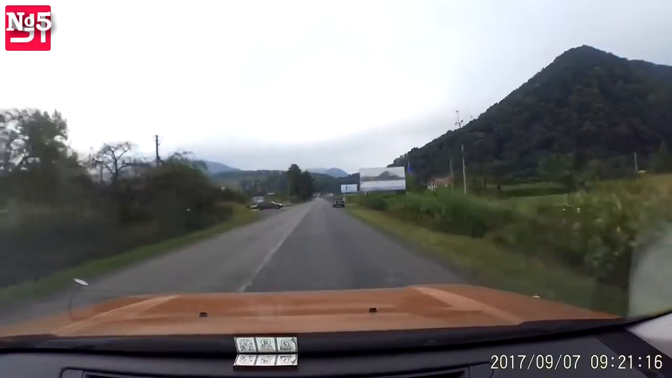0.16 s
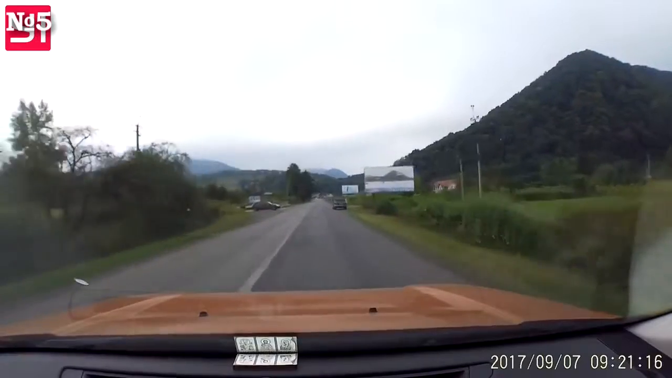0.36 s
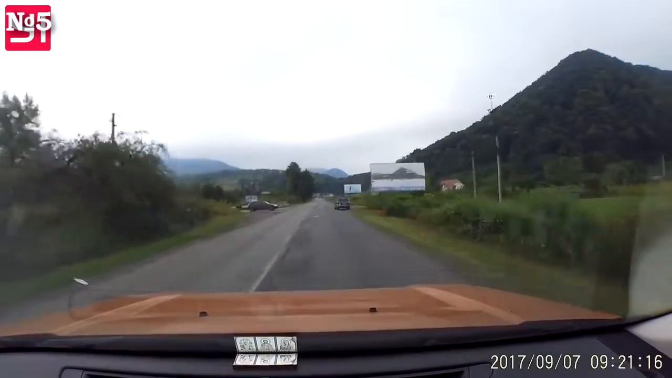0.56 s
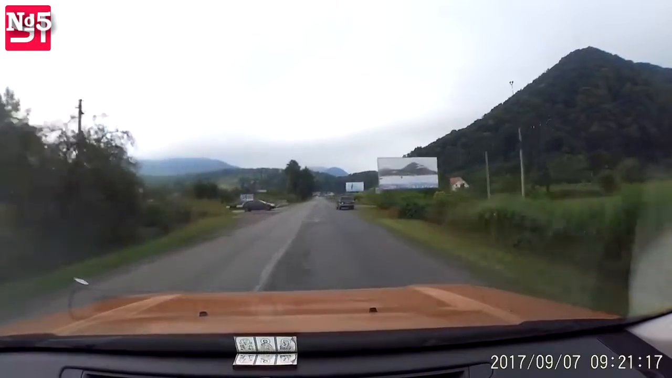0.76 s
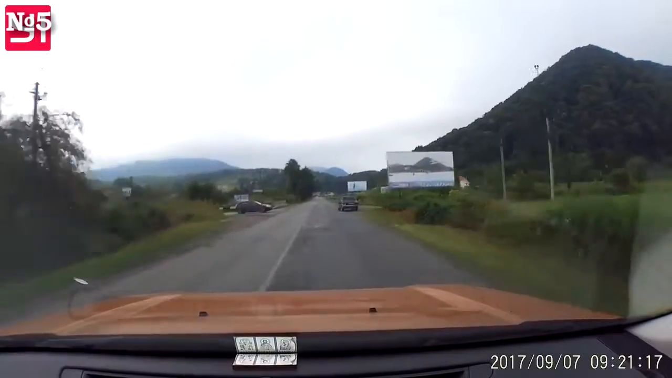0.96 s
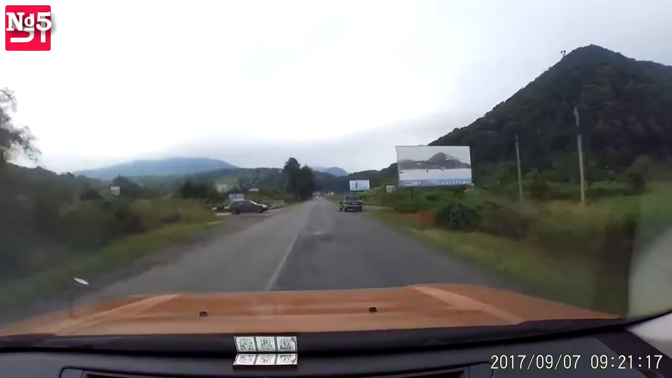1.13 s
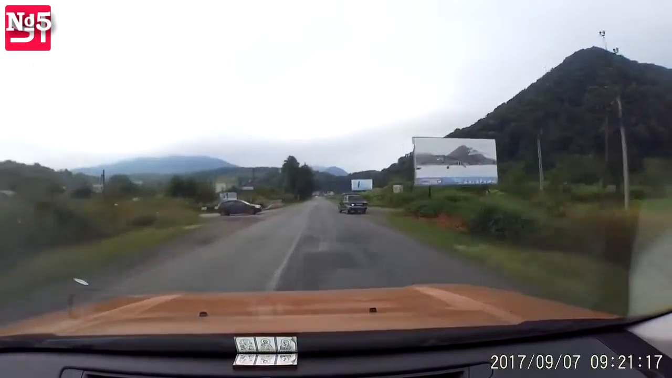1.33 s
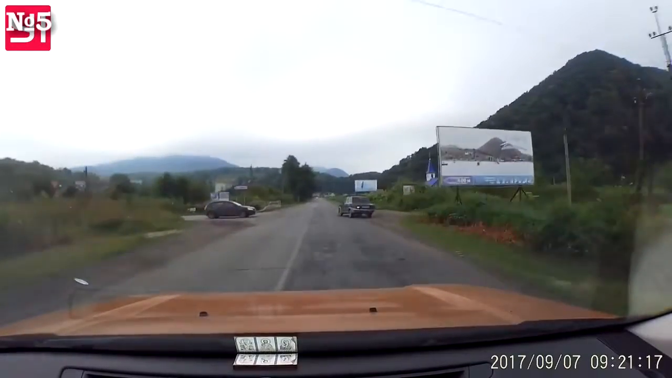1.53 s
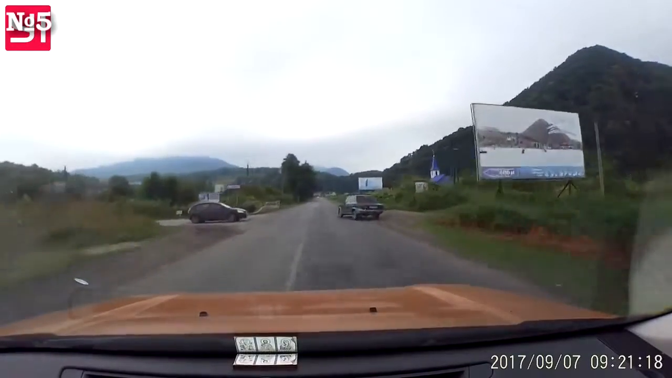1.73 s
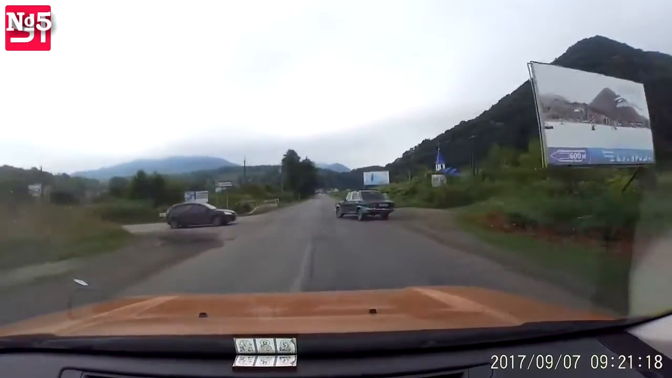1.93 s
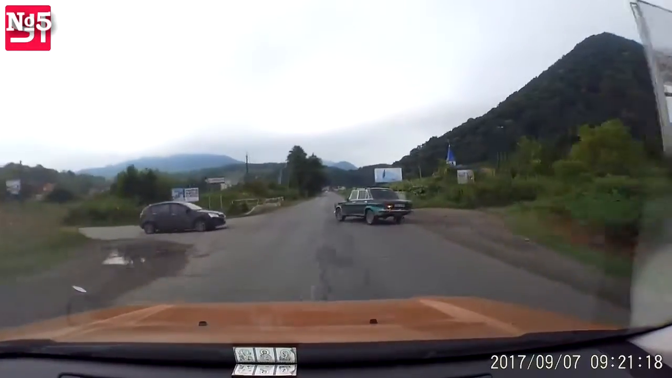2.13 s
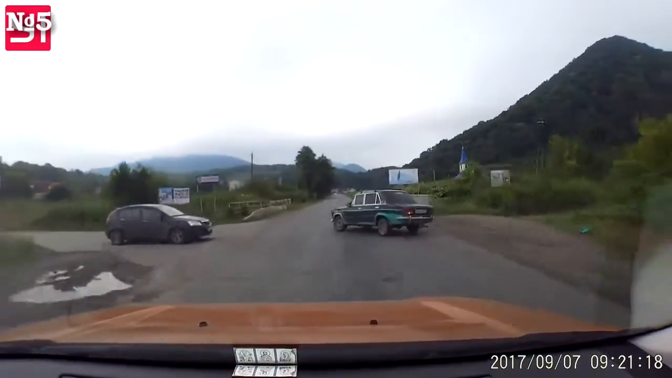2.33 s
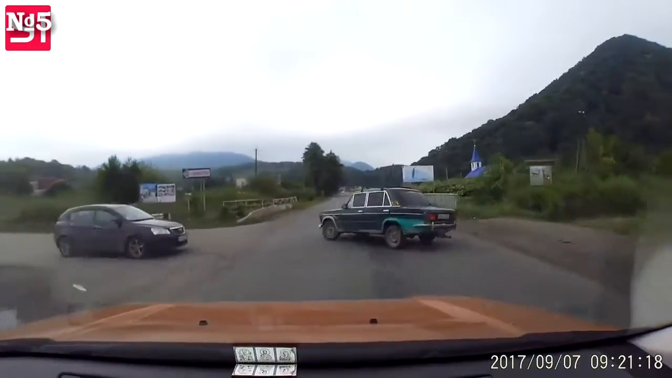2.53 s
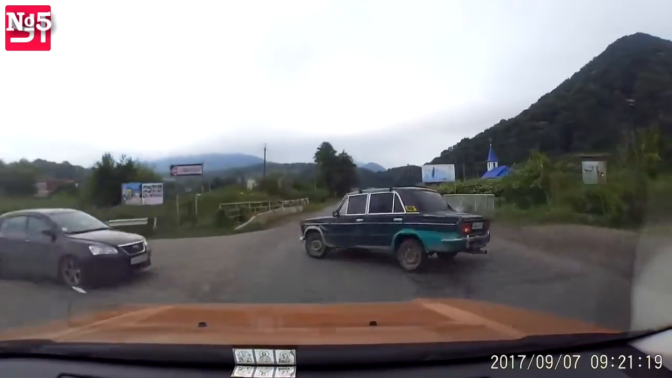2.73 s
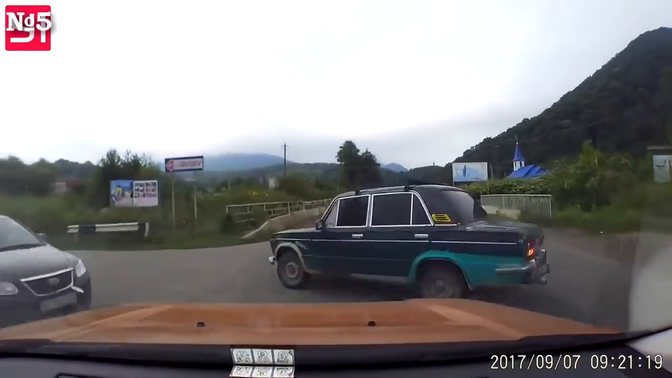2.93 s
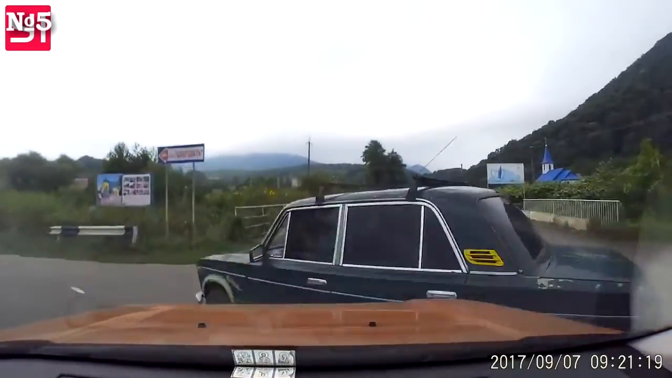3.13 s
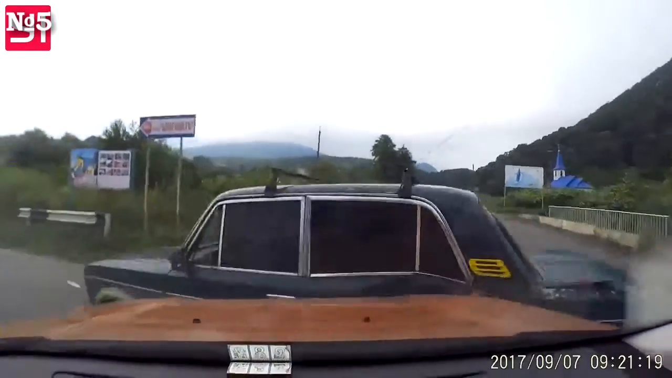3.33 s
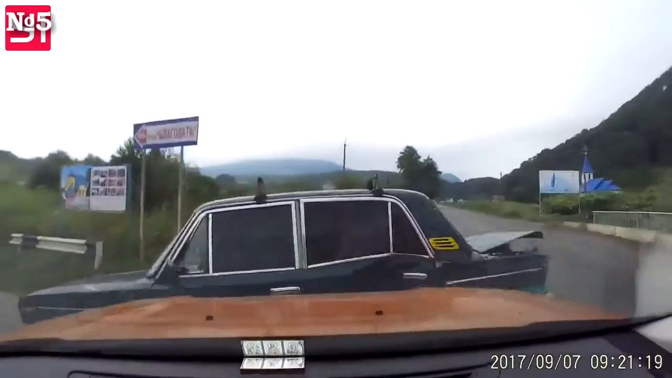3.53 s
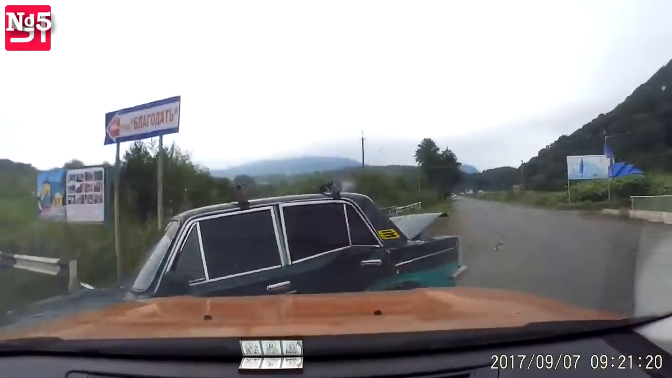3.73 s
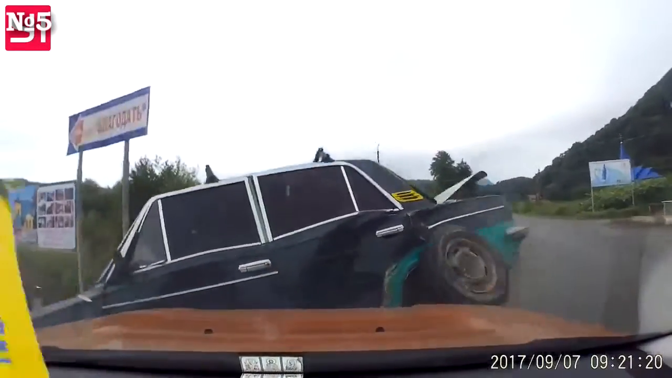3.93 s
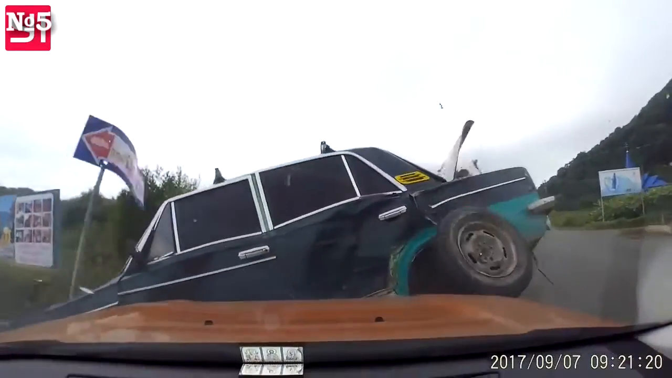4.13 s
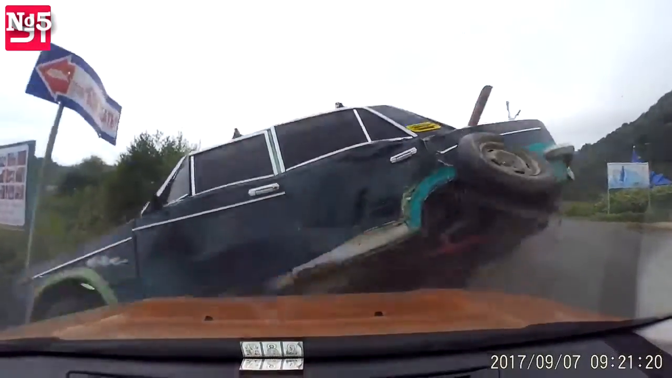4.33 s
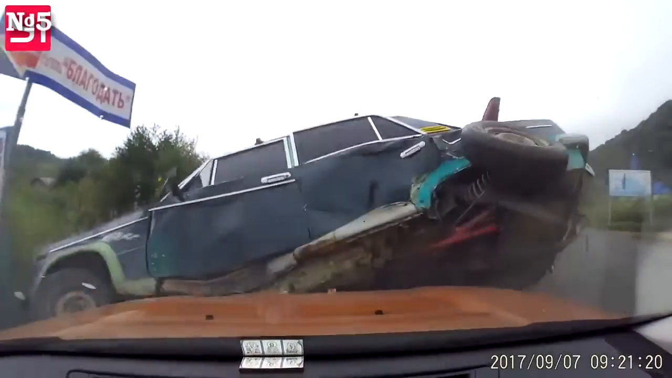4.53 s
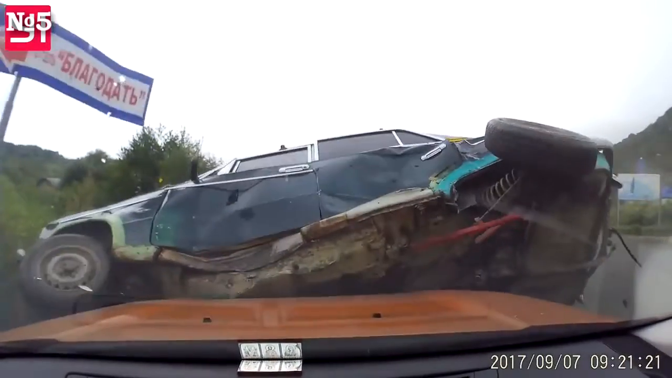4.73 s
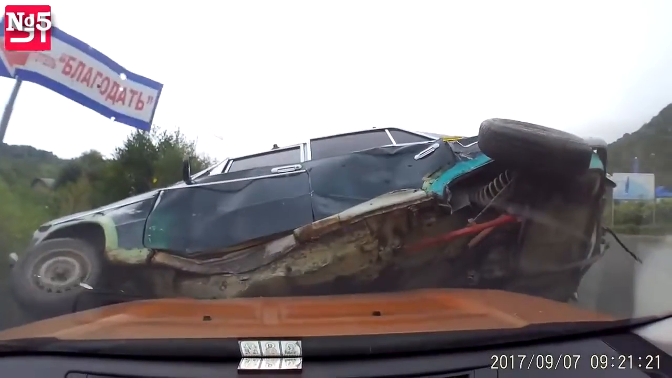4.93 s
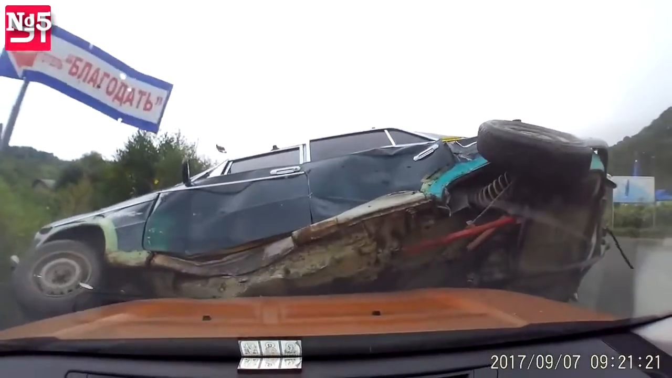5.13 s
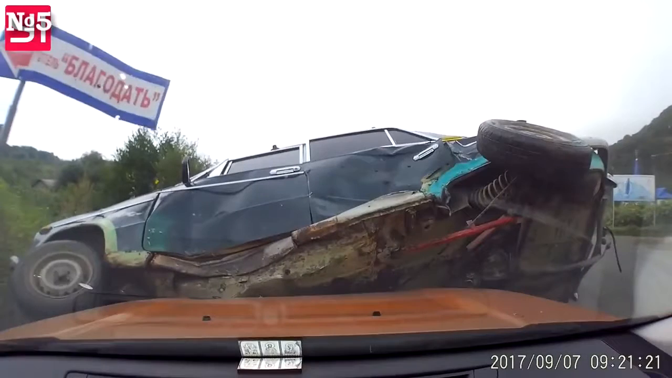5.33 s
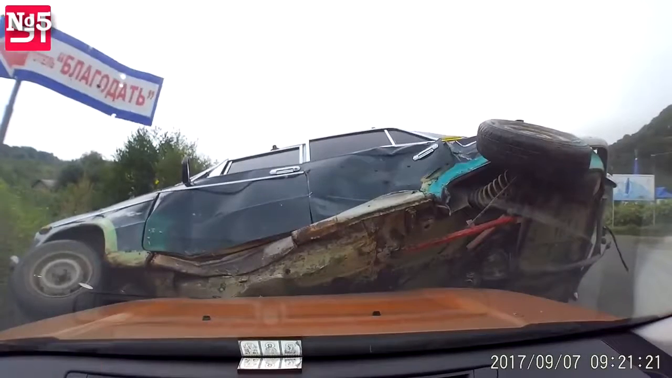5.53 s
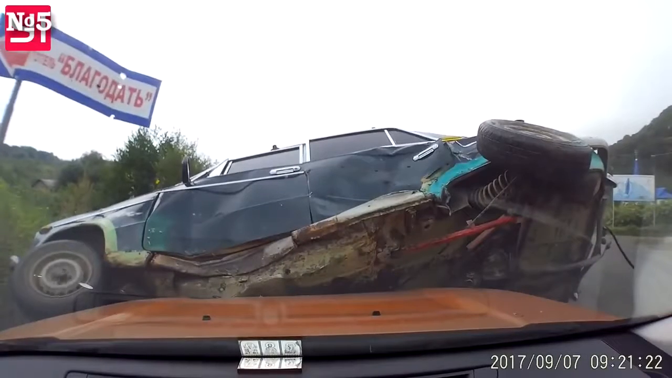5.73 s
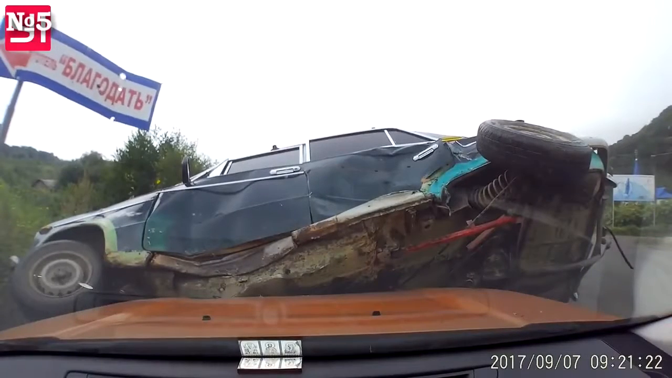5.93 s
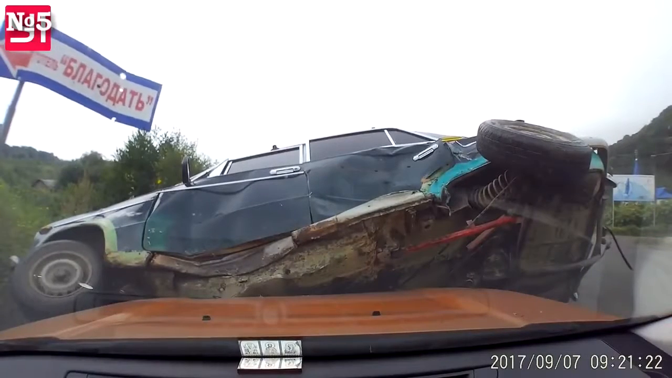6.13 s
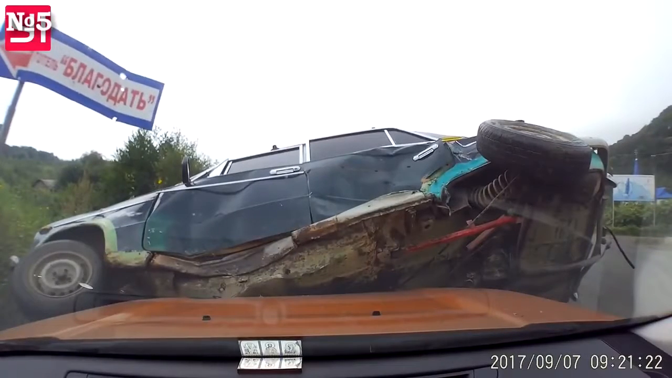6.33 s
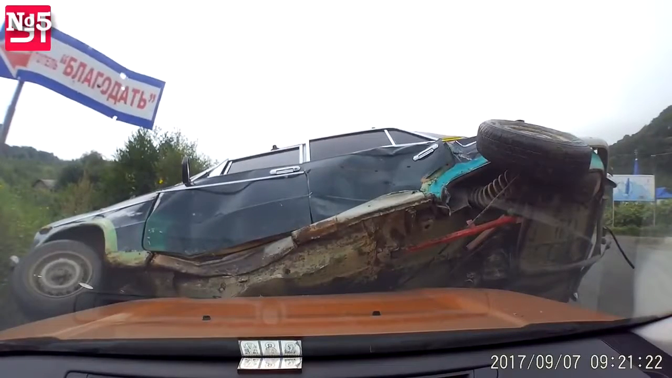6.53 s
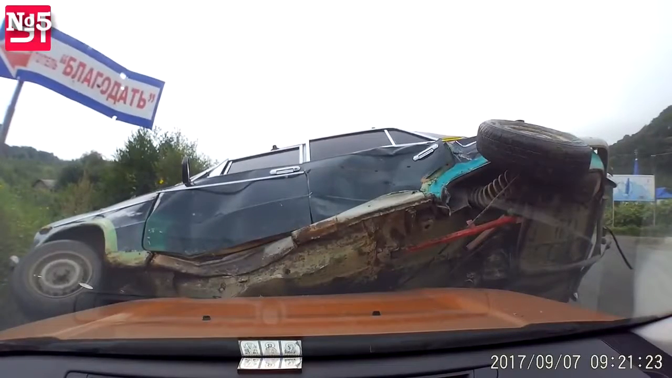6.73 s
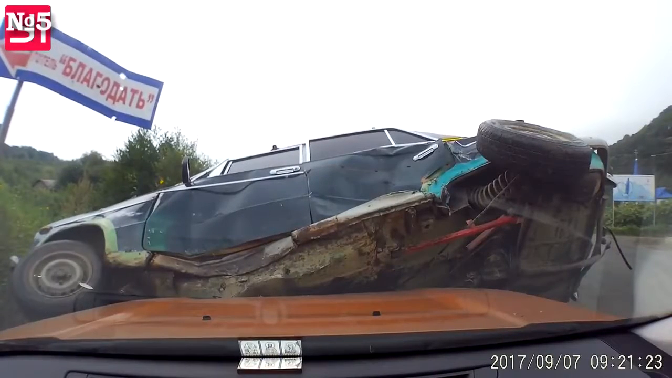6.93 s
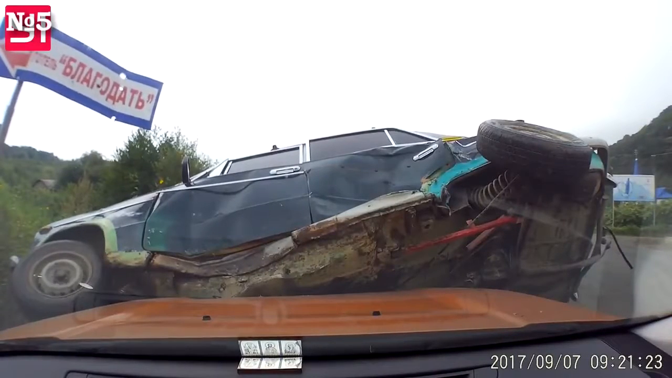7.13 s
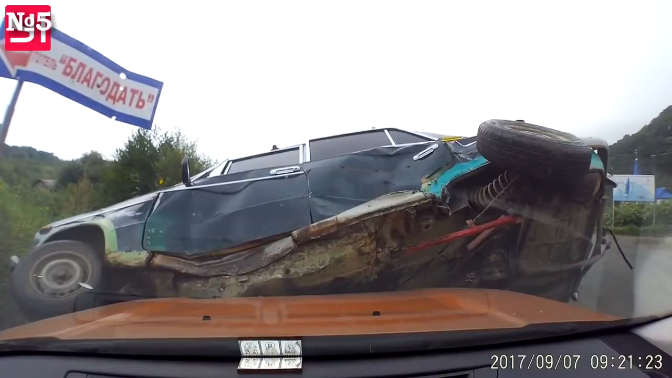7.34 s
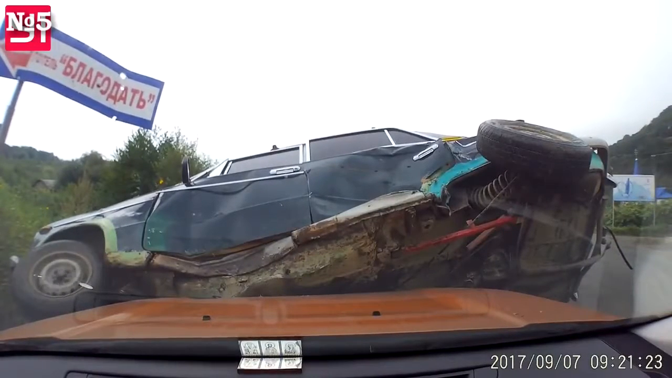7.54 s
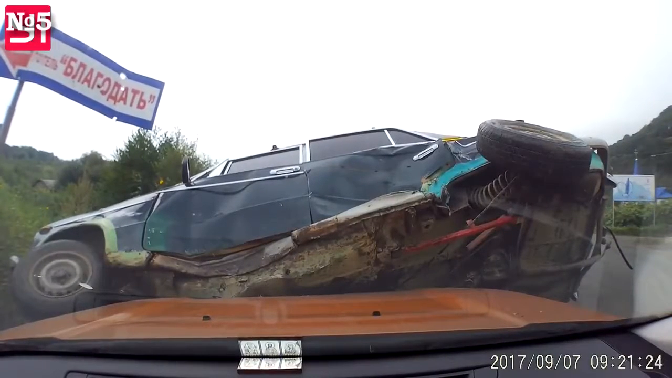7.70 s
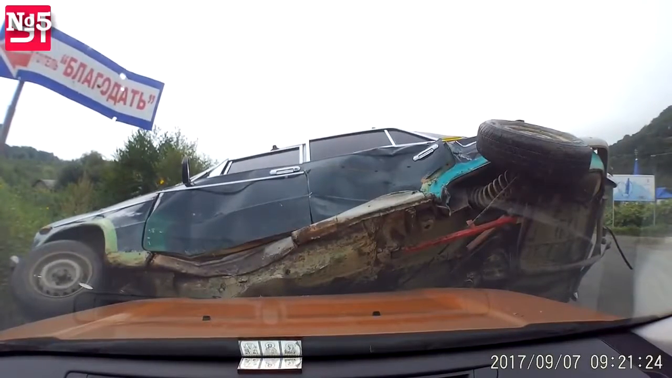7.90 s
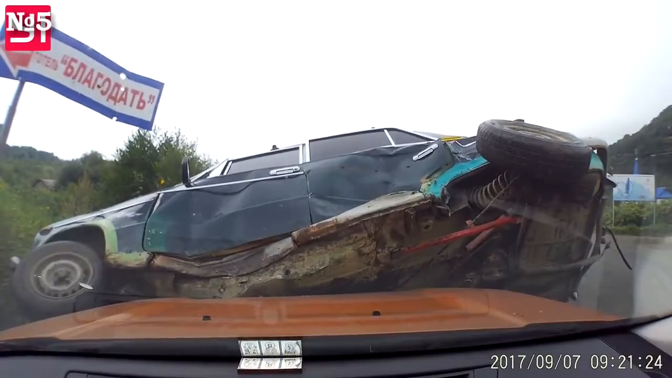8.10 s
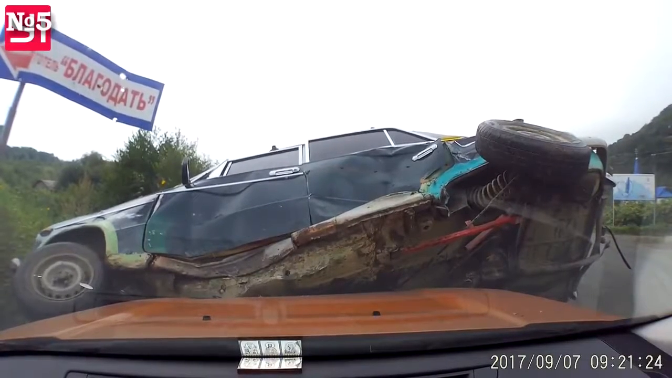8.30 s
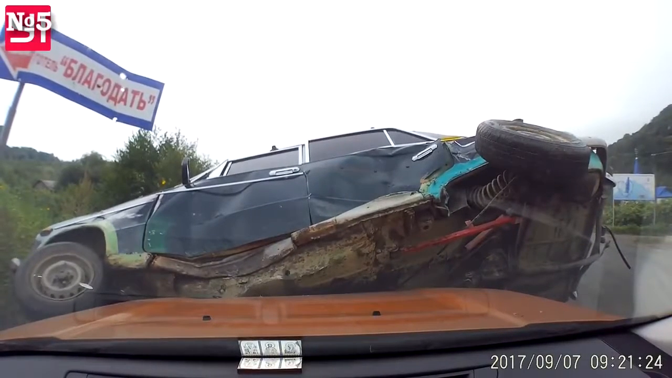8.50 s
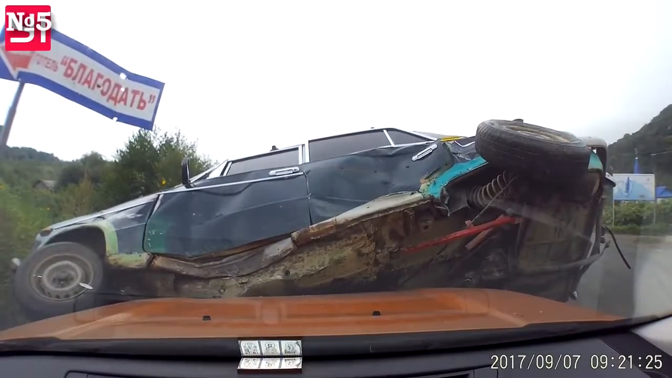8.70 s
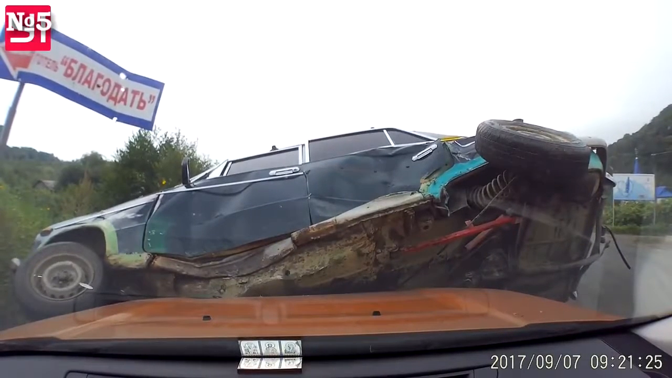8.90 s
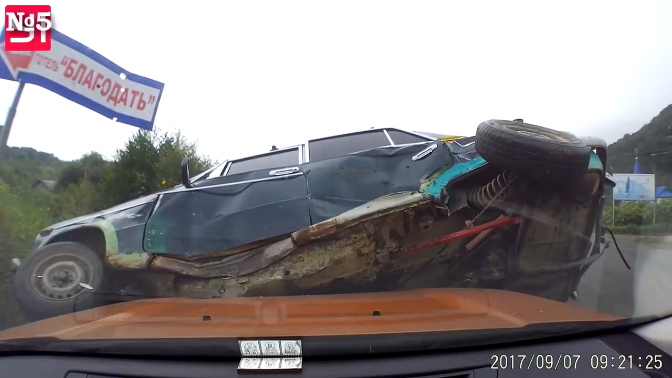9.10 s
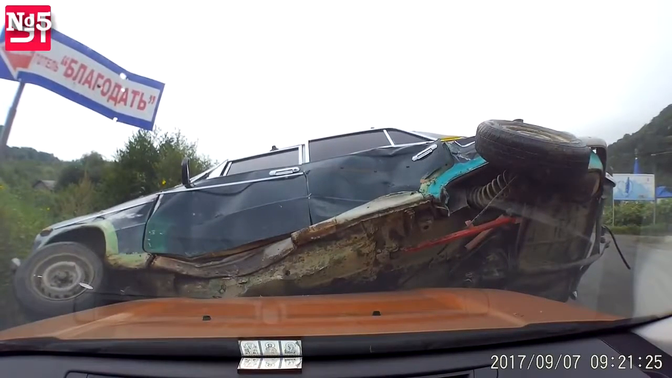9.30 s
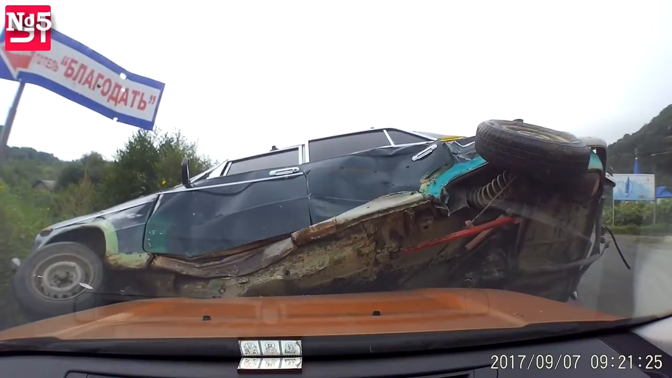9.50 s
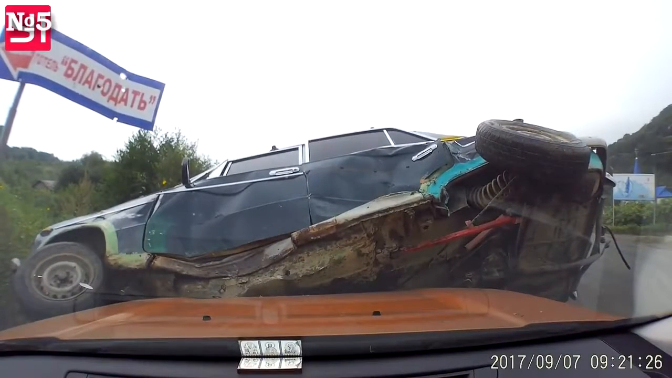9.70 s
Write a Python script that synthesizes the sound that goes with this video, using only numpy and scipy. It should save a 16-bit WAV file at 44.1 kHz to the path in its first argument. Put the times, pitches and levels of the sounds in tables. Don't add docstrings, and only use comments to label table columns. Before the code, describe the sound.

Close, boxy in-car sound through a cheap clipping microphone. Low road boom and roar swell as locked tyres scrape over grit. Several blows ring panels and boom the cabin air, the loudest distorting with metal crunch and glass shatter. A second heavy slam tips the other car, debris clatters, and quiet idling with faint creaky knocks remains until the engine revs to a high, hard whine.

```python
import sys
import numpy as np
from scipy import signal
from scipy.fft import rfft, irfft
from scipy.io import wavfile
from scipy.ndimage import uniform_filter1d

SR = 44100
rng = np.random.default_rng(int(sys.argv[2]) if len(sys.argv) > 2 else 0)


def store_pcm(level_fs):
    pcm = np.round(np.clip(level_fs, -1, 1) * 32767).astype(np.int16)
    wavfile.write(sys.argv[1], SR, np.atleast_2d(pcm).T)


def attenuation_scalar(level_db):
    decades = np.asarray(level_db, float) / 20
    return 10 ** decades


N = 430416

# start in seconds, peak in dB, panel in Hz, cabin boom in dB.
THUDS = [(1.099, -39.5, 95.6, -7.5), (1.943, -14, 97.6, -29), (2.263, -17.5, 83, -9),
         (2.688, -8, 112.6, -22), (3.001, -23, 108, -27.5), (2.933, -16, 115, -11.5),
         (2.975, -29.5, 103.6, -6.5), (3.164, -15, 82, -42), (3.286, -15, 108, -10.5),
         (3.328, 3.5, 109, -11.5), (3.342, -7.5, 83.3, -25), (3.366, -11.5, 92, -14.5),
         (3.385, -41, 73.3, -30), (3.518, -22, 150, -15), (3.894, -15, 132, -33), (3.957, -11.5, 70.6, -6),
         (4.01, -10.5, 66, -25), (4.082, -14, 115, -6.5), (4.196, -24, 131, -32), (4.394, -15, 121, -26.5),
         (4.423, -17.5, 73, -15), (4.689, -39, 72.7, -32.5), (2.955, -24, 140.4, -40.5),
         (4.971, -31, 96.7, -25), (5.243, -20, 106.6, -22.5)]
# start in seconds, peak in dB, panel in Hz.
SETTLING = [
    (6.115, -38.5, 215),
    (6.329, -32.5, 78),
    (6.381, -33, 147),
    (6.764, -41.5, 71.3),
    (7.042, -32, 97),
    (7.336, -40.5, 118),
    (7.93, -27, 88.4),
]
# start in seconds, peak in dB, clack relative to peak in dB, T60 in seconds.
CRUNCHES = [(1.852, -35, -11, 0.17), (2.07, -40, 12.5, .044), (2.2264, -32.5, 2, 0.21),
            (2.696, -27, -1.5, 0.084), (2.925, -28.5, -2.5, 0.086), (2.959, -25.5, -18, 0.058),
            (3.1719, -14, 5, 0.042), (3.158, -30.5, 9.5, .04), (3.3128, -5.5, 2.5, 0.034),
            (3.3283, -18.5, 7, 0.057), (3.345, -12.5, 2.5, .04), (3.3557, -18, 1, .025),
            (3.363, -20, 4, .012), (3.935, -35.5, -3, .12), (4.054, -40.5, 9, .04),
            (4.113, -39.5, 8.5, 0.066), (4.16, -39.5, -1, 0.055), (3.4673, -27, -0.5, 0.031),
            (3.9005, -24, -10, 0.084), (4.005, -30.5, 10.5, 0.043), (4.015, -32, 7, 0.031),
            (4.396, -39, 0, 0.088), (4.5002, -35.5, 10.5, 0.044), (4.5927, -42, 8, 0.06),
            (4.743, -36, 5, 0.13), (4.812, -37.5, 2, 0.14), (4.984, -35, -11, 0.041)]
# start in seconds, peak in dB, relative clack in dB, T60 in seconds.
SHATTERS = [(2.153, -28, 1.5, 0.076), (2.6724, -32.5, 2, 0.14), (2.818, -30, -13, 0.043),
            (3.0653, -27.5, -7, 0.073), (3.085, -27, 1, 0.26), (3.416, -27.5, 4, 0.072),
            (3.429, -21.5, -3, 0.081), (3.5926, -35, -9.5, 0.046), (3.81, -45.5, 4.5, 0.11),
            (4.189, -40, -11, 0.057), (4.516, -29, 8.5, 0.007), (4.518, -23, 11, .04),
            (4.539, -27, 2.5, .058), (5.323, -35.5, 2, 0.15), (5.36, -34.5, -14, 0.071),
            (6.0954, -40.5, 1, 0.091), (6.135, -35.5, -5.5, 0.13), (6.239, -45.5, 3, 0.24),
            (6.326, -41.5, -4, 0.082)]
# start in seconds, peak in dB, clack relative to peak in dB.
DEBRIS = [(5.1484, -38, 1.5), (5.2554, -24.5, 2.5), (5.2652, -25.5, 12.5), (5.2894, -38, -3),
          (5.482, -35.5, -0.5), (5.537, -43.5, 5), (5.7238, -33, 6.5), (5.783, -36, 4.5),
          (5.8107, -31.5, 0.5), (5.8627, -44, 9), (6.123, -28.5, -2.5), (6.3763, -48, 13.5),
          (7.0342, -48, 11.5), (7.3442, -49, 11)]
# start in seconds, peak in dB, fizz relative to peak in dB.
GRIT_TICKS = [(0.204, -33, -4.5), (0.3286, -34.5, 3.5), (2.0325, -28, -0.5), (2.0504, -28, 3),
              (2.1398, -26.5, 2.5), (2.225, -24.5, -19), (2.3048, -20, -1.5), (2.3555, -34.5, 0.5),
              (2.408, -35, -9.5), (2.6531, -20, -23.5), (2.9795, -21, -15), (3.512, -35, -13),
              (5.2447, -16.5, -17), (8.361, -37, -13), (4.017, -27, -3), (4.699, -44.5, -7),
              (6.767, -46, -9), (8.746, -48, -5.5), (2.2, -37.5, -1), (1.548, -42, 3)]
# start in seconds, peak in dB, note in Hz, T60
# in seconds.
PINGS = [(1.304, -31.5, 1010, 0.048), (1.664, -35, 1010, .06), (1.857, -38.5, 2880, 0.087),
         (1.871, -35, 1900, 0.075), (1.874, -38, 4140, .04), (3.347, -21.5, 6160, 0.025),
         (4.5155, -15, 6300, 0.017), (4.695, -18, 243, 0.077), (4.697, -26, 413, 0.046),
         (5.725, -22.5, 800, 0.024), (7.044, -26.5, 139.7, 0.085), (7.349, -31, 201, 0.074),
         (8.008, -28, 218, 0.17), (8.286, -31, 205, 0.13), (6.379, -35, 480, 0.057),
         (5.864, -31, 940, 0.042), (6.126, -40, 2550, 0.098), (6.128, -40.5, 4940, 0.1),
         (1.852, -43, 2136, .1), (1.853, -48, 3450, 0.052), (2.021, -35, 1116, .05),
         (2.924, -16.5, 105.4, 0.49), (3.173, -23, 1093, .05), (3.173, -22, 1490, .04),
         (3.175, -21.5, 3310, .05), (3.221, -22.5, 764, .06), (3.314, -25, 1790, 0.03),
         (3.314, -20.5, 2750, 0.043), (3.51, -39.5, 2670, 0.035), (3.662, -46, 4870, 0.046),
         (4.03, -23, 232.5, 0.21), (4.087, -22, 219.4, .12), (4.397, -26.5, 643, .05),
         (4.76, -35, 760, 0.13), (5.809, -44, 3240, .05), (5.809, -40, 5000, .05), (6.095, -40, 2500, .04),
         (6.128, -42, 2191, 0.097), (6.127, -44.5, 3950, 0.081), (6.14, -43, 4650, .08),
         (6.327, -45, 3900, 0.054), (6.327, -47, 5200, 0.027), (6.83, -43, 123, .12),
         (6.975, -36, 125, 0.14), (7.698, -43, 179.4, 0.43), (6.8, -56, 2000, 0.72),
         (.328, -42.5, 5720, .02), (2.034, -35, 1800, 0.017), (2.034, -35.5, 7240, 0.017),
         (2.1395, -29.5, 7340, .02), (2.1395, -30, 1430, 0.017), (2.2238, -36.5, 2400, 0.022),
         (2.305, -22, 4900, .015), (2.305, -28, 2400, 0.013), (2.3555, -28.5, 4900, 0.013),
         (2.3555, -27.5, 7350, 0.013), (2.407, -23.5, 480, .07), (3.204, -28.5, 700, 0.036),
         (4.006, -23, 800, 0.043), (4.018, -35, 6240, 0.013), (5.269, -24.5, 1290, .04),
         (5.256, -24, 453, .05), (5.266, -29.5, 594, 0.046), (8.363, -46, 1500, 0.022),
         (.204, -38, 1900, .025), (4.5155, -24, 2800, .012), (6.128, -43, 3020, .1), (6.128, -44, 3530, .1),
         (4.01, -25.5, 1154, 0.035)]

# time in seconds, firing rate in Hz, effort in dB.
ENGINE = [(5.3, 29.55, -2), (6.07, 28.94, 3), (6.6, 27.38, -1.5), (7.88, 25.74, 0.5), (8.29, 26.63, 0),
          (8.38, 28.24, -5.5), (8.54, 31.78, 7), (8.67, 45.2, -2.5), (8.81, 55.9, -5), (8.88, 61.25, -2.5),
          (8.96, 71.45, -6.5), (9.03, 79.3, -13), (9.22, 96.5, 1.5), (9.39, 108.8, -3.5), (9.6, 117.8, 4.5),
          (9.76, 125, 3)]
# multiple of firing rate, level in dB.
ORDERS = [(.5, -14.5), (1.5, -4), (1.75, 0), (2.5, -3), (3, 0.5), (3.5, -7.5), (4, -3.5), (5, -8.5),
          (6, -3), (6.5, -1), (7, -23), (8, -11), (10.5, -19.5), (11, -24.5)]
# multiple of firing rate,
# level in dB.
MORE_ORDERS = [(.75, -10), (1.25, -12), (2.25, -10), (2.75, -11.5), (3.25, -15), (3.75, -13.5),
               (4.25, -7.5), (4.5, -11), (5.5, -13), (7.5, -17), (9, -11), (9.5, -11.5), (10, -11.5)]
# centre in Hz, width in Hz, lift in dB.
CABIN = [(125, 26, -7.5), (205, 71, 10.5), (309, 47, 12.5), (480, 47, 6), (626, 43, 10), (690, 70, -9.5),
         (740, 30, 5.5), (800, 50, -5), (1280, 73, 15)]
# frequency in Hz, level in dB.
EXHAUST = [(20, -40.5), (45, -37.5), (76, -56), (87, -45), (125, -41.5), (185, -48), (230, -32.5),
           (262, -50)]
# frequency in Hz, level in dB per Hz.
INTAKE_COLOUR = [(700, -34.5), (1350, 0.5), (1650, 5.5), (2100, -5.5), (2900, 3), (3600, -1.5),
                 (4600, -11.5), (7000, -26)]

# time in seconds, level in dB.
SCRAPE = [
    [(1.75, -58.5), (2.102, -56), (2.666, -50.5), (2.854, -45.5), (2.982, -38), (3.1, -48.5)],
    [(3.37, -87.5), (3.478, -61.5), (3.75, -65)],
]
# frequency in Hz, level in dB per Hz.
SCRAPE_COLOUR = [(2500, -31.5), (4300, 2), (5500, 0.5), (7300, 5.5), (8000, -5.5), (9000, -25)]

# frequency in Hz, level in dB per Hz.
BOOM_COLOUR = [(7.1, -33), (12, -6.5), (38, -0.5), (90, -16.5), (120, -40.5), (200, -120)]
# frequency in Hz, level in dB per Hz.
DRUMMING_COLOUR = [(35, -34.5), (60, -3.5), (113, -3), (141, -9.5), (172, -12), (205, -9), (322, -21.5),
                   (407, -23), (480, -20.5), (620, -73.5), (1060, -120)]
# frequency in Hz, level in dB per Hz.
ROAR_COLOUR = [(190, -5.5), (330, 1), (389, -1), (464, 0.5), (566, 0.5), (662, -3.5), (854, -7), (1010, -9),
               (1800, -19.5), (2340, -25.5), (3960, -120)]
# frequency in Hz, level in dB per Hz.
HISS_COLOUR = [(760, -42.5), (1300, -3), (1470, -1), (1620, -2.5), (2110, 0), (2630, 1), (4150, -3),
               (4930, -4.5), (7310, -4), (7840, -15), (8480, -23), (11000, -58.5), (18700, -120)]
# time in seconds, boom in dB.
BOUNCE = [(0, -28.5), (.36, -23), (.87, -25.5), (1.4, -30), (1.76, -27.5), (2.18, -22.5), (2.63, -17),
          (2.95, -19.5), (3.12, -22), (3.31, -36.5), (3.39, -22), (3.65, -21.5), (3.85, -28), (4.26, -20),
          (4.49, -45), (4.63, -22.5), (5.4, -33.5), (5.6, -56.5)]
# time in seconds, drumming in dB.
ROUGHNESS = [(0, -37), (.4, -35), (.95, -29), (1.4, -31.5), (1.76, -29), (2.0, -30.5), (2.37, -27.5),
             (2.63, -27.5), (2.93, -21.5), (3.12, -41)]
# peak time in seconds, drumming in dB, grinding in dB, 20 dB fade in seconds.
SHOVES = [
    (3.328, -18, -33, 0.28),
    (3.97, -31.5, -42, 0.57),
    (4.148, -28, -48.5, 0.68),
    (4.49, -23, -40, 0.2),
    (4.77, -27.5, -41.5, 0.23),
    (5.0, -26, -53, 0.14),
    (5.21, -33.5, -39.5, .5),
    (8.07, -42, -56.5, 1.0),
    (8.45, -44.5, -65, 0.4),
]
# boom, drumming, roar, hiss, all in dB.
REST_DB = (-52.5, -53.5, -52.5, -59.5)

# centre in Hz, width in Hz, lift in dB.
MOUNT = [(108, 8.9, 2), (453, 36, -2.5), (552, 47, 1), (725, 64, 2), (873, 58, -4.5), (1010, 78, 1.5),
         (1255, 40, 0.5), (1296, 24, 1.5), (1656, 86, 1.5), (1706, 67, -5.5), (2160, 90, -3.5),
         (2750, 71, 2.5), (3320, 73, -2.5), (3460, 17, 5.5), (4050, 44, -7.5)]
# frequency in Hz, level in dB.
MIRROR = [(7300, -1), (7700, 2.5), (8000, -1), (8500, -13), (8900, -36.5), (11300, -27), (12500, -46),
          (14000, -54.5), (15100, -57.5), (15600, -81)]
# start in seconds, end in seconds.
DROPOUTS = [
    (3.139, 3.326),
    (3.843, 3.899),
    (4.354, 4.414),
    (5.25, 5.309),
    (5.698, 5.758),
]

BOOM_HZ, PANEL_CYCLES_PER_T60 = 42.16, 12
SETTLING_T60_S, SETTLING_BOOM_DB = 0.23, -20
SLAM_S, SLAM_DB, SLAM_LASTS_S = 4.5125, -3, 0.046
METAL_FIZZ_DB, GLASS_FIZZ_DB, DEBRIS_FIZZ_DB = -16, 0.5, -22.5
DEBRIS_T60_S, TICK_CLACK_DB, TICK_T60_S = 0.06, 4, 0.0076

IDLE_HZ, SECOND_DB, EFFORT_SHARE = 29, -2.5, 0.61
PULL_DB, PULL_HZ, PULL_WIDTH_HZ = 9, 72, 9
EASE_HZ, EASE_DB_PER_HZ = 103, 0.04
# dB at four times idle, dB per octave of revs
REV_DRUMMING, REV_ROAR, REV_HISS = (-47, 16), (-41.5, 6.4), (-58, 44)
REV_INTAKE, REV_ORDERS = (-44.5, 42), (-49.5, 9)
INTAKE_FULL_DB = -48

STOP_S, STOP_DB_PER_S = 3.54, 142.5
ROAR_DB, ROAR_FOLLOWS, WIND_DB, WIND_FOLLOWS = -39.5, 0.4, -52, 0.35
BRAKE_S, BRAKE_HISS_DB, BRAKE_DB_PER_S = 1.66, -56, 7.5
SHOVE_RISE_SHARE, GRIND_HISS_DB, BOUNCE_DRUMS_DB = 0.64, -6.5, -15
REST_DUCKS, DUCK_FROM_DB = 0.74, -30

OVERLOAD_LEVEL, CAMERA_HZ = 0.44, 16000
LINE_CONTRAST, CONTRAST_FROM_HZ = 0.23, 200
DROP_HZ, DROP_DB = 4600, -37
CLICK_S, CLICK_DB = 3.3135, -28


def at_hz(points, hz):
    point_hz, point_db = np.transpose(points)
    return np.interp(np.log(hz), np.log(point_hz), point_db, left=-150, right=-150)


def in_time(rows):
    s, *columns = np.transpose(rows)
    return [np.interp(np.arange(N) / SR, s, column) for column in columns]


def rms_one(x):
    return x / np.sqrt(np.mean(x ** 2) + 1e-20)


def power_sum(*levels_db):
    return 10 * np.log10(sum(attenuation_scalar(2 * np.asarray(db)) for db in levels_db))


def drift(rate_hz):
    r = np.exp(-80 * np.pi * rate_hz / SR)
    slow = signal.lfilter([1], [1, -2 * r, r * r], rng.standard_normal(N // 40 + 2002))[2000:]
    return np.interp(np.arange(N) / 40, np.arange(len(slow)), rms_one(slow))


def coloured(spectrum, flicker_db, flicker_hz):
    hz = np.maximum(np.arange(N // 2 + 1) * SR / N, 1)
    noise = irfft(rfft(rng.standard_normal(N)) * attenuation_scalar(at_hz(spectrum, hz)), N)
    return rms_one(noise * attenuation_scalar(flicker_db * drift(flicker_hz)))


def band(x, low_hz, high_hz):
    return signal.sosfilt(signal.butter(2, [low_hz, high_hz], "band", fs=SR, output="sos"), x)


def thuds():
    out, t = np.zeros(N + SR), np.arange(SR // 2) / SR
    shaking = rms_one(band(rng.standard_normal(N + SR), 70, 334))
    blows = [(s, db, hz, PANEL_CYCLES_PER_T60 / hz, boom_db) for s, db, hz, boom_db in THUDS]
    blows += [(s, db, hz, SETTLING_T60_S, db + SETTLING_BOOM_DB) for s, db, hz in SETTLING]
    for s, peak_db, hz, t60_s, boom_db in blows:
        i = round(s * SR)
        dying = attenuation_scalar(-60 * t / max(t60_s, 0.02)) * (1 - np.exp(-t / 0.0037))
        sagging = 2 * np.pi * hz * t * (1 - 1.0 * t)
        panel = attenuation_scalar(peak_db) * dying * (0.93 * np.sin(sagging) + 0.59 * shaking[i:i + len(t)])
        boom_envelope = attenuation_scalar(boom_db - 60 * t / (2.1 * t60_s + 0.037)) * (1 - np.exp(-t / 0.0055))
        boom = boom_envelope * np.sin(2 * np.pi * BOOM_HZ * t)
        out[i:i + len(t)] -= panel + boom
    return out[:N]


def slam():
    t = np.arange(N) / SR - SLAM_S
    after_s = t - SLAM_LASTS_S
    level_db = SLAM_DB - 20.3 * np.clip(after_s / 0.0034, 0, 1) - 85 * np.clip(after_s, 0, 1)
    heave = np.clip(t / 0.036 + 0.72, 0, 1) * (t > 0) * attenuation_scalar(level_db)
    shudder = rms_one(band(rng.standard_normal(N), 130, 380))
    return -heave * (np.sin(2 * np.pi * BOOM_HZ * t) + 0.2 * shudder)


def fractures(rows, spread_db, rise_share):
    sizes = attenuation_scalar(spread_db * rng.exponential(1, N)) * rng.choice([-1, 1], N)
    grains = sizes * (rng.random(N) < 12000 / SR)
    bands_hz = [(450, 1860), (1500, 4100), (4700, 6820)]
    carriers = [rms_one(band(grains, low_hz, high_hz)) for low_hz, high_hz in bands_hz]
    power, t = np.zeros((3, N + SR)), np.arange(SR // 4) / SR
    for s, peak_db, clack_db, fizz_db, t60_s in rows:
        levels_db = peak_db + np.array([[clack_db - 4], [-3], [fizz_db - 2.0]])
        lasting_s = max(t60_s, 0.004) * np.array([[1.3], [1], [0.85]])
        rise = 1 - np.exp(-t / (rise_share * lasting_s))
        i = round((s - rise_share * t60_s) * SR)
        power[:, i:i + len(t)] += attenuation_scalar(2 * (levels_db - 60 * t / lasting_s)) * rise ** 2
    return np.sum(np.sqrt(power[:, :N]) * carriers, axis=0)


def breakage():
    bursts = [(s, db, clack_db, METAL_FIZZ_DB, t60_s) for s, db, clack_db, t60_s in CRUNCHES]
    bursts += [(s, db, clack_db, GLASS_FIZZ_DB, t60_s) for s, db, clack_db, t60_s in SHATTERS]
    bursts += [(s, db, clack_db, DEBRIS_FIZZ_DB, DEBRIS_T60_S) for s, db, clack_db in DEBRIS]
    return fractures(bursts, spread_db=2.5, rise_share=0.05)


def grit():
    ticks = [(s, db, TICK_CLACK_DB, fizz_db, TICK_T60_S) for s, db, fizz_db in GRIT_TICKS]
    return fractures(ticks, spread_db=3.0, rise_share=0.039)


def pings():
    out, t = np.zeros(N), np.arange(SR // 4) / SR
    for s, peak_db, hz, t60_s in PINGS:
        noise = rng.standard_normal(2 * len(t))
        rattle = rms_one(band(noise, hz / 1.1, hz * 1.093)[len(t):])
        note = np.sin(2 * np.pi * hz * t) + 1.07 * rattle
        envelope = attenuation_scalar(peak_db - 60 * t / t60_s) * (1 - np.exp(-t / (0.07 * t60_s)))
        i = round(s * SR)
        out[i:i + len(t)] += note * envelope
    return out


def revved(law):
    top_db, db_per_octave = law
    return top_db + db_per_octave * (np.log2(in_time(ENGINE)[0] / IDLE_HZ) - 2)


def orders(table, turn):
    firing_hz, effort_db = in_time(ENGINE)
    pull_db = PULL_DB / (1 + ((firing_hz - PULL_HZ) / PULL_WIDTH_HZ) ** 2)
    ease_db = EASE_DB_PER_HZ * np.maximum(firing_hz - EASE_HZ, 0)
    load_db = revved(REV_ORDERS) + EFFORT_SHARE * effort_db + pull_db - ease_db
    out = np.zeros(N)
    for multiple, level_db in table:
        hz = multiple * firing_hz[::64]
        lift_db = sum(top_db / (1 + (2 * (hz - centre_hz) / width_hz) ** 2)
                      for centre_hz, width_hz, top_db in CABIN)
        gain = np.repeat(attenuation_scalar(level_db + lift_db), 64)[:N]
        waver_db = 1.5 * drift(5)
        out += attenuation_scalar(load_db + waver_db) * gain * np.cos(multiple * turn + rng.uniform(0, 2 * np.pi))
    return out * (np.arange(N) / SR > ENGINE[0][0])


def engine():
    firing_hz, effort_db = in_time(ENGINE)
    first_db = effort_db + at_hz(EXHAUST, firing_hz)
    second_db = SECOND_DB + EFFORT_SHARE * effort_db + at_hz(EXHAUST, 2 * firing_hz)
    turn = 2 * np.pi * np.cumsum(firing_hz * (1 + 0.0012 * drift(7.6))) / SR
    low_orders = attenuation_scalar(first_db + 5.0) * np.cos(turn) + attenuation_scalar(second_db + 2.5) * np.cos(2 * turn)
    fade_in = np.clip((np.arange(N) / SR - ENGINE[0][0]) / 0.17, 0, 1)
    return low_orders * fade_in + orders(ORDERS, turn)


def more_orders():
    return orders(MORE_ORDERS, 2 * np.pi * np.cumsum(in_time(ENGINE)[0]) / SR)


def intake():
    level_db = -power_sum(-revved(REV_INTAKE), -INTAKE_FULL_DB)
    return attenuation_scalar(level_db) * coloured(INTAKE_COLOUR, 0.86, 20)


def scrape():
    braking, shoving = SCRAPE
    level_db, = in_time([(1.6, -100)] + braking + [(3.2, -38)] + shoving + [(3.9, -76)])
    return attenuation_scalar(level_db + 1.5) * coloured(SCRAPE_COLOUR, 2.7, 22)


def shove_levels_db():
    t = np.arange(N) / SR
    drumming, grinding = [], []
    for s, drum_db, grind_db, fade_s in SHOVES:
        fade_db = -20 * np.maximum((t - s) / fade_s, (s - t) / (fade_s * SHOVE_RISE_SHARE))
        drumming.append(drum_db + fade_db)
        grinding.append(grind_db + fade_db)
    return power_sum(*drumming), power_sum(*grinding)


def road():
    t = np.arange(N) / SR
    (bounce_db,), (rough_db,) = in_time(BOUNCE), in_time(ROUGHNESS)
    stop_db = -STOP_DB_PER_S * np.maximum(t - STOP_S, 0)
    swing_db = rough_db - np.mean(ROUGHNESS, axis=0)[1]
    outside_braking_s = np.maximum(np.maximum(BRAKE_S - t, t - SHOVES[0][0]), 0)
    brake_db = BRAKE_HISS_DB + BRAKE_DB_PER_S * (np.minimum(t, STOP_S) - BRAKE_S)
    brake_db = brake_db - STOP_DB_PER_S * outside_braking_s
    shove_db, grind_db = shove_levels_db()
    duck_db = REST_DUCKS * np.maximum(bounce_db - DUCK_FROM_DB, 0)
    rest_boom_db, rest_drum_db, rest_roar_db, rest_hiss_db = [db - duck_db for db in REST_DB]
    rev_drum_db = revved(REV_DRUMMING)
    boom_db = power_sum(bounce_db, rest_boom_db, rev_drum_db)
    drum_db = power_sum(rough_db + stop_db, shove_db, bounce_db + BOUNCE_DRUMS_DB, rest_drum_db, rev_drum_db)
    rolling_db = ROAR_DB + ROAR_FOLLOWS * swing_db + stop_db
    roar_db = power_sum(rolling_db, grind_db, rest_roar_db, revved(REV_ROAR))
    wind_db = WIND_DB + WIND_FOLLOWS * swing_db + stop_db
    hiss_db = power_sum(wind_db, brake_db, grind_db + GRIND_HISS_DB, rest_hiss_db, revved(REV_HISS))
    boom = attenuation_scalar(boom_db) * coloured(BOOM_COLOUR, 2.4, 9.7)
    drumming = attenuation_scalar(drum_db) * coloured(DRUMMING_COLOUR, 1.86, 10.0)
    roar = attenuation_scalar(roar_db) * coloured(ROAR_COLOUR, 0.36, 16)
    hiss = attenuation_scalar(hiss_db) * coloured(HISS_COLOUR, 0.99, 14)
    return boom + drumming + roar + hiss


def mount(x):
    for hz, width_hz, lift_db in MOUNT:
        r = np.exp(-np.pi * width_hz / SR)
        poles = [1, -2 * r * np.cos(2 * np.pi * hz / SR), r * r]
        ringing = signal.lfilter([(1 - r * r) / 2, 0, (r * r - 1) / 2], poles, x)
        x = x + (attenuation_scalar(lift_db) - 1) * ringing
    return x


def scene():
    crash = thuds() + slam() + breakage() + grit() + pings()
    motor = engine() + more_orders() + intake()
    return mount(crash + motor + scrape() + road())[None]


def line_contrast(x):
    hz, _, lines = signal.stft(x, SR, nperseg=2048)
    height = np.abs(lines) + 1e-12
    contrast = (LINE_CONTRAST * (hz > CONTRAST_FROM_HZ))[:, None]
    pushed = lines * (height / uniform_filter1d(height, size=15, axis=-2)) ** contrast
    power_before = uniform_filter1d(height ** 2, size=15, axis=-2)
    power_after = uniform_filter1d(np.abs(pushed) ** 2, size=15, axis=-2)
    pushed *= np.sqrt(power_before / power_after)
    return signal.istft(pushed, SR, nperseg=2048)[1][..., :N]


def coarse_sampling(x):
    t, hz = np.arange(N) / SR, np.arange(1, N // 2 + 2) * SR / N
    x = irfft(rfft(x) * (hz < CAMERA_HZ / 2), N)
    mirrored = x * (1 + 2 * np.cos(2 * np.pi * CAMERA_HZ * t))
    return irfft(rfft(mirrored) * attenuation_scalar(at_hz([(0.88, 0.022)] + MIRROR, hz)), N)


def treble_dropouts(x):
    t = np.arange(N) / SR
    dull = signal.sosfiltfilt(signal.cheby2(16, 30, DROP_HZ + 150, fs=SR, output="sos"), x)
    lost = sum((t > start_s) & (t < end_s) for start_s, end_s in DROPOUTS)
    return x + uniform_filter1d(lost * 1.0, size=90) * (1 - attenuation_scalar(DROP_DB)) * (dull - x)


def band_limit(x):
    return signal.sosfilt(signal.butter(12, 15750, fs=SR, output="sos"), x)


def record(dry):
    x = OVERLOAD_LEVEL * np.tanh((np.abs(dry) / OVERLOAD_LEVEL) ** 4) ** (1 / 4) * np.sign(dry)
    x = signal.sosfilt(signal.butter(1, 1.5, "high", fs=SR, output="sos"), x)
    x = treble_dropouts(coarse_sampling(line_contrast(x)))
    click = np.arange(N) // 2 == round(CLICK_S * SR / 2)
    mix = x + attenuation_scalar(CLICK_DB) * click
    return band_limit(mix)


dry = scene()
out = record(dry)
store_pcm(out)
```